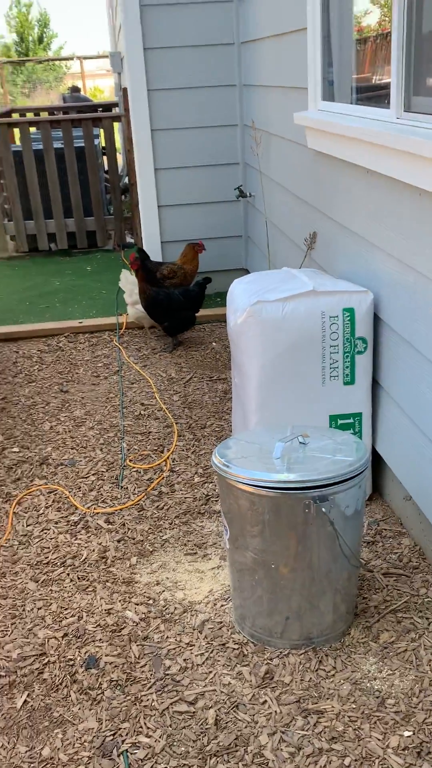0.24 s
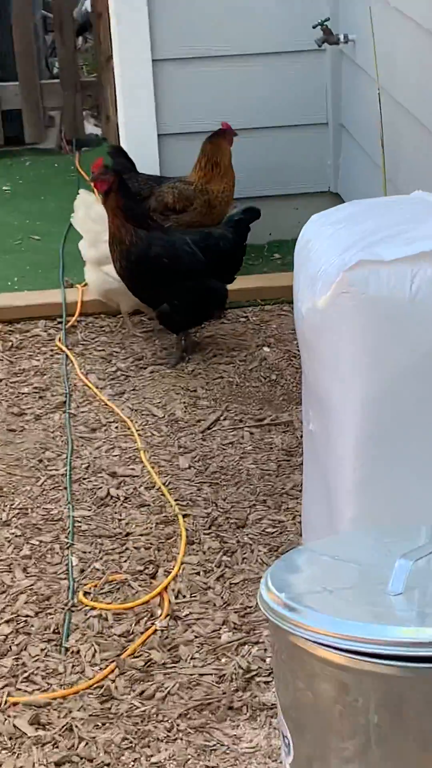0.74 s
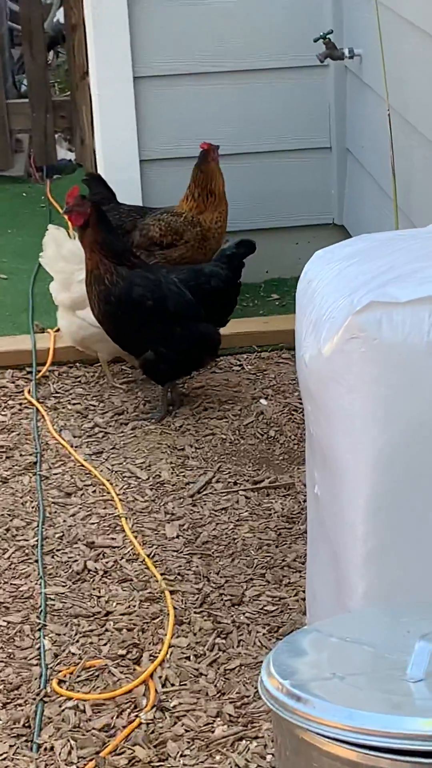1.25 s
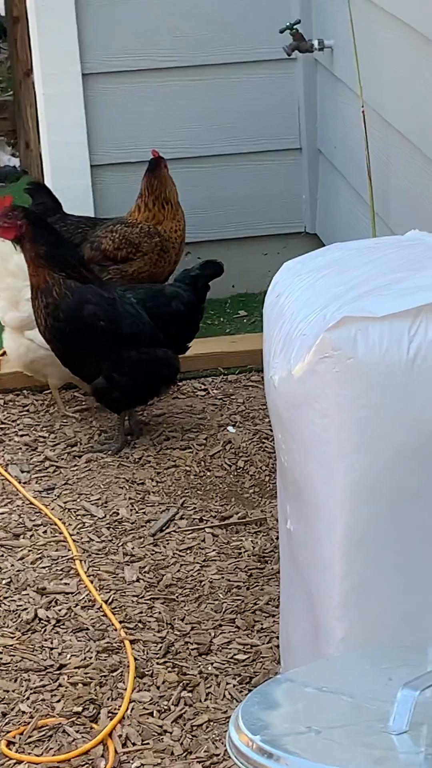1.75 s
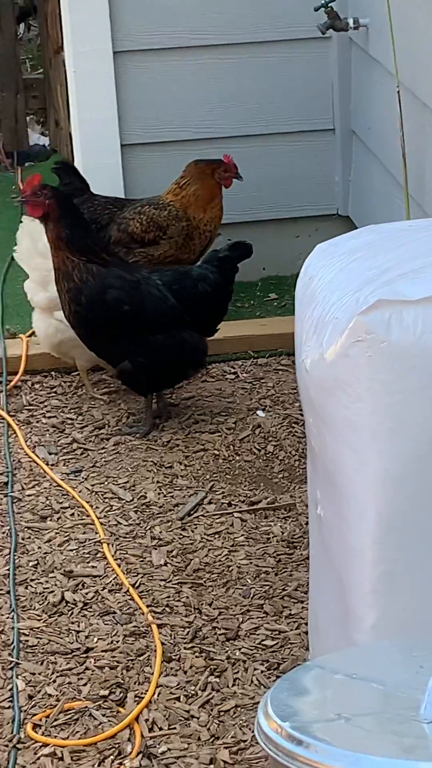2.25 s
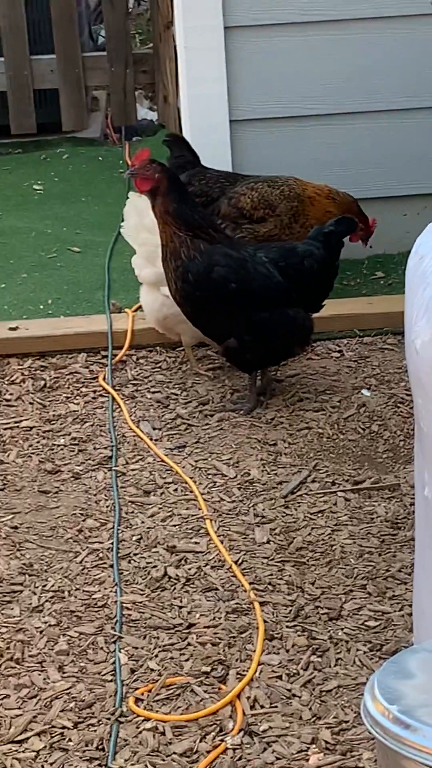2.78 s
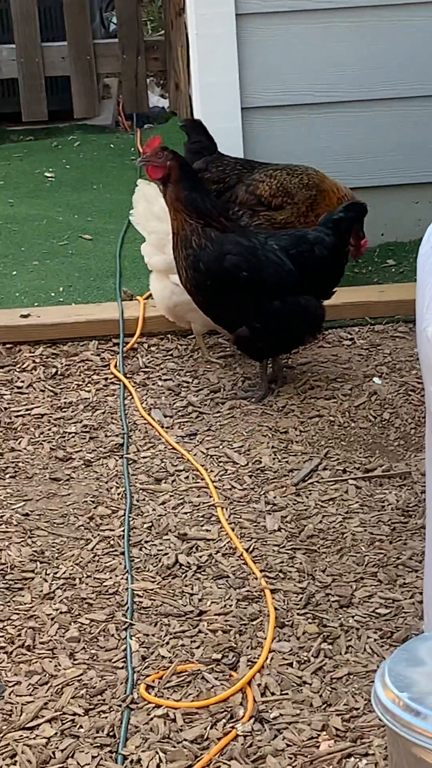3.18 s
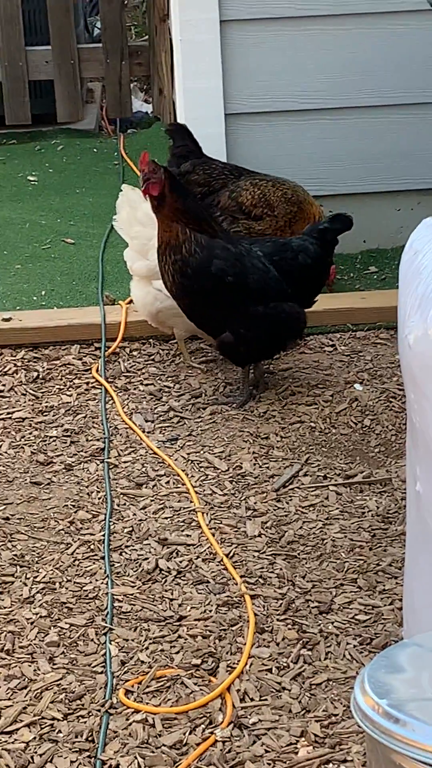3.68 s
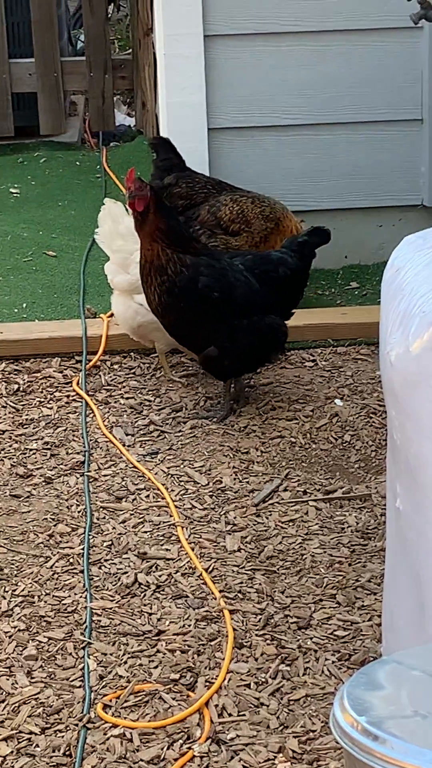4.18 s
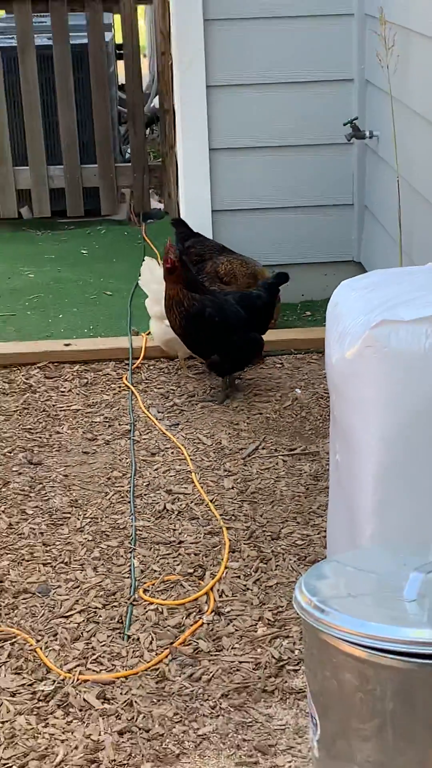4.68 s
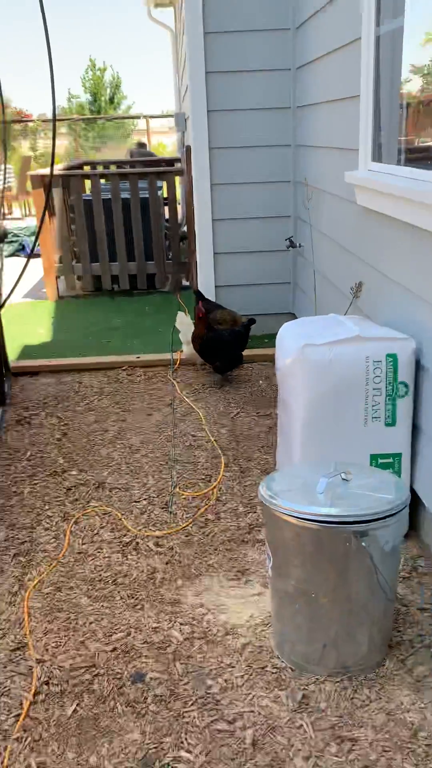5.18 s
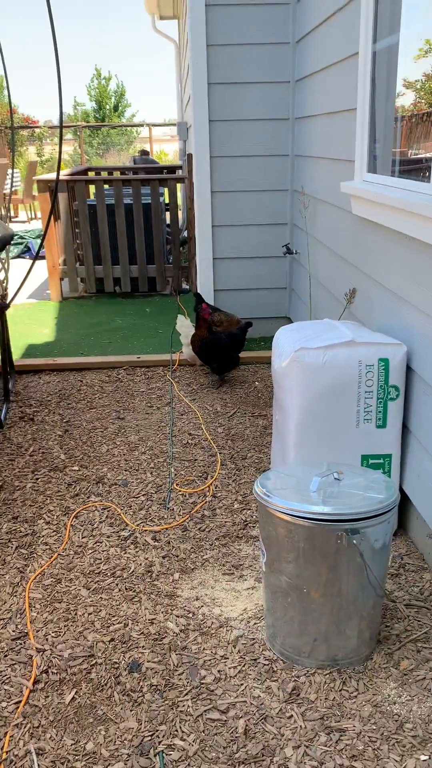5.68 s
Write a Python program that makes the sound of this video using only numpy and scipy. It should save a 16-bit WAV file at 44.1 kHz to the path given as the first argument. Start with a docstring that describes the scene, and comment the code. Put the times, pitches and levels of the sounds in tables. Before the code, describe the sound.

A hand-held camera a few metres away picks up one hen outdoors: dull, rattling clucks, a sudden bright squawk, more clucks, a second squawk, a pause, then five evenly spaced clucks. The background is a soft distant rumble with barely audible rustling and wood-chip ticks. Handling thumps come before the squawk and just as the last clucks begin. The yard adds a short, light echo.

```python
"""Hen cackling in a backyard run

A hen gives short rattling clucks beside a house wall, twice building into a long squawk that starts
hoarse, clears to a rising tone and cracks at its peak. Her voice is a train of pulses plus puffs of noise,
shaped by throat and beak. Shaped noise makes a low outdoor rumble, rustling and light swishes.
Fading low tones are bumps on the hand-held camera; tiny noise bursts are wood chips ticking."""
import sys
import numpy as np
from scipy import signal
from scipy.fft import rfft, irfft, next_fast_len
from scipy.io import wavfile
from scipy.ndimage import uniform_filter1d, map_coordinates

SR = 44100
rng = np.random.default_rng(int(sys.argv[2]) if len(sys.argv) > 2 else 0)


def dump_mix(stems):
    """Bounce the given channels to the path in sys.argv[1] as a 16-bit WAV at rate SR."""
    frames = np.atleast_2d(stems).T  # one column per channel
    limited = np.clip(frames, -1, 1)  # hard clip at full scale
    pcm = np.round(limited * 32767).astype(np.int16)
    wavfile.write(sys.argv[1], SR, pcm)


N = 261513

# Clucks. Each row: start in seconds, level in dB, swell time in seconds,
# typical beak resonance in Hz, its basic strength in dB.
CLUCKS = [(-.036, -36.5, .005, 2750, -17), (.281, -34.5, .016, 2810, -20.5), (1.27, -30, .008, 2850, -17.5),
          (2.103, -29, .024, 2180, -19), (2.399, -33, .017, 2690, -23.5), (3.24, -31.5, .002, 2697, -20.5),
          (4.646, -30, .006, 2864, -17.5), (4.944, -33, 0.024, 3143, -14.5),
          (5.244, -33.5, .025, 3130, -13.5), (5.528, -34.5, .028, 2936, -11.5),
          (5.828, -32, 0.026, 3106, -13)]
# Long squawks. Each row: start, moment it locks into a tone, is pushed, cracks, collapses and ends
# (all in seconds), depth of the brief dip in dB, treble change in dB.
SQUAWKS = [(1.517, 1.636, 1.748, 1.828, 1.865, 1.892, 5, -1.5),
           (3.519, 3.642, 3.736, 3.829, 3.858, 3.9, 11, 1)]
# Throat with the beak wide open. Each row: frequency in Hz, gain in dB.
OPEN_THROAT = [(200, -30.5), (450, -10), (640, -36.5), (880, 3.5), (1100, 5), (1330, -13), (1600, -23.5),
               (1820, -10), (2230, -3.5), (2500, -40), (4900, -48.5), (8400, -32), (12000, -43.5),
               (16000, -56.5)]
# Throat with the beak nearly shut. Each row: frequency in Hz before the neck shifts it, gain in dB.
SHUT_THROAT = [(100, -37.5), (260, -10.5), (430, -16.5), (620, -27.5), (820, -2), (1050, 1.5), (1220, -7),
               (1520, -28), (1900, -18.5), (2400, -40), (3400, -54.5), (16000, -79.5)]
# Upper resonances of the open beak. Each row: frequency in Hz, nominal width in Hz, strength in dB.
OPEN_MODES = [(3326, 240, -19), (4206, 300, -23), (5973, 540, -25.5), (7920, 360, -33.5)]
# Upper resonances of a cluck. Each row: frequency in Hz, nominal width in Hz, basic strength in dB.
CLUCK_MODES = [(3820, 330, -23.5), (5540, 300, -41), (6930, 300, -36.5), (8900, 950, -44),
               (14400, 3000, -52)]
# Wood chips ticking. Each row: start in seconds, peak level in dB, centre frequency in Hz.
TICKS = [(0.407, -41, 700), (0.595, -51.5, 1380), (.961, -50, 12430), (2.03, -57.5, 7890),
         (3.118, -45.5, 676)]
# Bumps on the camera. Each row: start in seconds, level in dB before the soft onset,
# frequency in Hz, time to fade by 60 dB in seconds.
BUMPS = [(.897, -28, 66, 0.17), (.925, -38, 100, 0.32), (4.688, -33, 108.5, 0.48),
         (4.704, -28.5, 213.6, 0.13), (4.734, -33, 159, 0.22), (4.772, -31, 98, 0.17)]
# Colour of the distant rumble. Each row: frequency in Hz, relative level in dB per Hz.
RUMBLE = [(20, -31), (48, -8), (67, 0.5), (88, -9), (140, -20), (270, -22.5), (350, -27.5), (630, -34),
          (1000, -31.5), (1500, -39.5), (2100, -51.5), (4800, -62.5), (6500, -54.5), (14000, -67)]
# Colour of the shuffling. Each row: frequency in Hz, relative level in dB per Hz.
SHUFFLE_COLOUR = [(35, -41.5), (60, -12.5), (101, -3.5), (244, -8), (289, -7), (590, -16.5), (2900, -30.5),
                  (3890, -44), (4600, -71.5), (9000, -73.5), (11700, -99), (19800, -120)]
# Colour of the swishes. Each row: frequency in Hz, relative level in dB per Hz.
SWISH_COLOUR = [(1500, -23), (3500, -6.5), (6800, 1.5), (9000, -11.5), (14500, -5.5)]
# Shuffling close to the camera. Each row: start in seconds, length in seconds, level in dB.
SHUFFLES = [(0, .57, -60), (4.67, 0.05, -39.5), (5.5, 0.5, -67)]
# Light, high swishes. Each row: start in seconds, length in seconds, level in dB.
SWISHES = [(0, 0.073, -62), (.17, .15, -64), (5.42, .08, -67)]
# How alike left and right are in the background noise. Each row: frequency in Hz, likeness (1 is mono).
ALIKE = [(60, 1), (150, 0.99), (380, .7), (950, 0.0039), (15000, 0.034)]
# Balance of the two microphone ports. Each row: frequency in Hz, left minus right in dB.
PORT_BALANCE = [(270, -0.14), (480, 2), (620, -0.5), (800, -13.5), (1000, -10), (1220, -1), (1500, 1.5),
                (2050, -1), (3000, 0.5), (5000, 0), (15000, -0.5)]
# Phase between the ports. Each row: frequency in Hz, radians by which left leads.
PORT_PHASE = [(0, -1), (550, 0), (1400, 0), (2050, 1.19), (3200, 1.04), (4900, 3), (6800, 6.5), (9100, 9.5),
              (15000, 19)]
# Tail of diffuse echoes. Each row: frequency in Hz, time to fade by 60 dB in seconds.
YARD = [(200, 0.49), (1000, 0.27), (3000, .26), (10000, 0.036)]

TOP_HZ = 15800  # upper band limit of the camera
RUMBLE_DB = -52.5  # typical level of the distant rumble
CLUCK_S, CLUCK_THROAT_HZ = .058, 1042  # length and main throat resonance of every cluck
CLUCK_START_HZ, CLUCK_END_HZ = 172.24, 279.64  # the pulse rate climbs through a cluck
ABRUPT_HZ, ABRUPT_S = 89.6, .006  # a cluck that swells within about this time starts higher
CLUCK_SPREAD = .04  # chance variation of pitch from cluck to cluck (share)
START_HZ, TONE_HZ = 179.6, 445.5  # the hoarse start climbs to the pitch of the clear tone
GLIDE_HZ, GLIDE_POWER = 52.24, 2.6  # the tone then rises ever faster until it cracks
CRACK_HZ, CRACK_HOLD_S, FALL_HZ_PER_S = 42, .022, 2200  # the pitch jumps by this, holds and falls away
# level of each stage of a squawk
HOARSE_DB, TONE_DB, PUSHED_DB, CRACKED_DB, COLLAPSED_DB = -29, -21, -15, -12, -25
SWELL_S, SWELL_DB = .024, 16.5  # the hoarse start swells by this much
LOCK_S, LOCK_LEAD_S, PUSH_S, SNAP_S = .018, 0.011, .009, .004  # how quickly the stages take over
CRACKED_OPENING = .68  # beak opening 0-1 once the voice has cracked
DIP_HZ, DIP_WIDTH_HZ = 480.3, 5.1  # the level dips briefly as the tone passes this pitch
# roughness 0-1 of each stage; the strain is added to the hoarse start and grows until the tone locks
HOARSE_ROUGH, STRAIN_ROUGH, TONE_ROUGH, CRACKED_ROUGH, COLLAPSED_ROUGH = .3, .35, .025, 0.23, .55
TREBLE_HZ = 5000  # a squawk is brighter or duller above this


def amp(db):
    """Turn decibels into a gain."""
    return 10 ** (np.asarray(db) / 20)


def unit(x):
    """Scale a sound to an rms level of 1."""
    return x / np.sqrt(np.mean(x ** 2) + 1e-20)


def along(points, hz):
    """Read a curve of (Hz, value) points on a logarithmic frequency axis."""
    f, v = np.transpose(points)
    return np.interp(np.log(hz + 1), np.log(f + 1), v)


def wobble(rate, size):
    """A smooth random curve with this many random points a second."""
    return map_coordinates(rng.standard_normal(4096), [np.arange(size) * rate / SR], mode="wrap")


def step(t, width):
    """A smooth change from 0 to 1 around t = 0."""
    return .5 + .5 * np.tanh(t / width)


def filtered(x, response):
    """Filter a sound by a complex response that depends on frequency."""
    size = x.shape[-1]
    m = 2 * next_fast_len(size // 2 + 4096)
    return irfft(rfft(x, m) * response(np.fft.rfftfreq(m, 1 / SR)), m)[..., :size]


def add(track, s, x):
    """Mix x into the track from time s."""
    start = round(s * SR)
    x = x[max(-start, 0):N - start]
    track[max(start, 0):][:len(x)] += x


def throat(points, hz):
    """A throat with the gains of the (Hz, dB) points, which only responds after it is excited."""
    cepstrum = irfft(np.log(amp(along(points, hz))))
    half = len(cepstrum) // 2
    # keeping only the forward half gives the phase that fits these gains
    return np.exp(rfft(np.r_[cepstrum[0], 2 * cepstrum[1:half]], 2 * half))


def resonances(modes, hz):
    """Steep-sided resonances: each is a simple resonance passed through twice."""
    total = 0
    for centre, width, db in modes:
        damping = 1j * hz * 0.96 * width
        total = total + amp(db) * (damping / (centre * centre - hz * hz + damping)) ** 2
    return total


def syrinx(pitch, rough, jitter, shimmer_db, rasp):
    """The voice organ: one pulse a cycle; roughness scatters timing and size and adds puffs of noise."""
    size = len(pitch)
    uneven_pitch = pitch * (1 + jitter * rough * wobble(330, size))
    phase = 2 * np.pi * np.cumsum(uneven_pitch) / SR - 1
    k = np.arange(1, 81)[:, None]  # harmonic numbers
    harmonics = np.cos(k * phase) * (k * pitch < TOP_HZ)
    pulses = np.sum(harmonics, axis=0) * np.sqrt(pitch / SR) * 2
    puffs = unit((1 + np.cos(phase)) ** 2) * rng.standard_normal(size)
    return (pulses + rasp * rough * puffs) * amp(shimmer_db * rough * wobble(400, size))


def shut_beak(hz, throat_hz, beak_hz, beak_db, treble_db):
    """The throat of a cluck: the neck stretches or shortens it, and the beak adds its own resonance."""
    stretch = 1050 / throat_hz
    beak = resonances([(beak_hz, 340, beak_db)], hz)
    return throat(SHUT_THROAT, hz * stretch) + beak + amp(treble_db) * resonances(CLUCK_MODES, hz)


def scatter(x, life=.008, level_db=1.0, above_hz=1700, turn_rate=9):
    """Short waves glance off feathers, ground and boards; their pattern drifts as the head moves."""
    t = np.arange(SR // 30) / SR
    clouds = filtered(rng.standard_normal((3, len(t))) * np.exp(-t / life),
                      lambda hz: 1 - 1 / (1 + (hz / above_hz) ** 6))
    clouds = clouds / np.linalg.norm(clouds, axis=1, keepdims=True)
    paths = signal.fftconvolve(x[None], clouds, axes=1)[:, :len(x)]
    facing = np.array([wobble(turn_rate, len(x)) for _ in paths])
    shares = facing / np.sqrt(np.sum(facing ** 2, axis=0) + .1)
    return x + amp(level_db) * np.sum(paths * shares, axis=0)


def clucks(onset_db=-9, attack=0.00089, sag_db=-3, release=0.018, beak_fall=0.027):
    """Each cluck is a short run of uneven pulses that speed up while the pressure swells and sags."""
    out, t = np.zeros(N), np.arange(SR // 8) / SR
    late = np.minimum(t / CLUCK_S, 1)
    for s, db, swell, beak_hz, beak_db in CLUCKS:
        start_hz = CLUCK_START_HZ + ABRUPT_HZ * np.exp(-swell / ABRUPT_S)
        pitch = start_hz + (CLUCK_END_HZ - start_hz) * np.tanh(2 * t / CLUCK_S)
        pitch = pitch * (1 + CLUCK_SPREAD * rng.standard_normal())
        effort_db = onset_db * np.maximum(1 - t / swell, 0) + sag_db * np.maximum(t - swell, 0) / CLUCK_S
        pressure = amp(effort_db) * (1 - np.exp(-t / attack)) * (1 - np.tanh((t - CLUCK_S) / release))
        source = pressure * syrinx(pitch, rough=.3, jitter=.13, shimmer_db=3.5, rasp=.55)
        # the cluck starts dull; its beak resonance grows and sinks as it goes on
        early_voice = filtered(source * (1 - late), lambda hz: shut_beak(
            hz, CLUCK_THROAT_HZ, beak_hz * (1 + beak_fall), beak_db - 0.5, treble_db=-2.5))
        late_voice = filtered(source * late, lambda hz: shut_beak(
            hz, CLUCK_THROAT_HZ, beak_hz * (1 - beak_fall), beak_db + 2, treble_db=0.5))
        voice = unit(scatter(early_voice + late_voice))
        # the level counts over the cluck's length, not over the whole stretch of t
        add(out, s, amp(db) * voice * np.sqrt(CLUCK_S * SR / len(t)))
    return out


def rush(spectrum):
    """Stereo noise of rms 1, near mono in the bass."""
    def mid_and_side(hz):
        """Shares of the common sound and of the left-right difference."""
        turn = np.arccos(np.clip(along(ALIKE, hz), -1, 1)) / 2
        return amp(along(spectrum, hz)) * [np.cos(turn), np.sin(turn)]
    mid, side = filtered(rng.standard_normal((2, N)), mid_and_side)
    return unit(np.array([mid + side, mid - side]))


def strokes(rows, attack, fall_db_per_s):
    """Gain of (start s, length s, dB) movements that rise, hold and die away."""
    t = np.arange(N) / SR
    gain = np.zeros(N)
    for s, length, db in rows:
        fall_db = fall_db_per_s * np.maximum(t - s - length, 0)
        gain += step(t - s, attack) * amp(db - fall_db)
    return gain


def background():
    """Distant rumble, uneven shuffling and light swishes, all noise with wavering levels."""
    rumble = amp(RUMBLE_DB + 0.79 * wobble(11, N)) * rush(RUMBLE)
    shuffling = strokes(SHUFFLES, attack=0.045, fall_db_per_s=34.5) * amp(1.3 * wobble(60, N))
    swishing = strokes(SWISHES, attack=.015, fall_db_per_s=168) * amp(2.2 * wobble(35, N))
    return rumble + shuffling * rush(SHUFFLE_COLOUR) + swishing * rush(SWISH_COLOUR)


def knocks():
    """Dry ticks of wood chips (brief filtered noise) and soft low bumps on the camera (fading tones)."""
    out, t = np.zeros(N), np.arange(SR // 3) / SR
    for s, db, centre_hz in TICKS:
        burst = amp(-60 * t / 0.0033) * rng.standard_normal(len(t))
        tick = filtered(burst, lambda hz: resonances([(centre_hz, 0.94 * centre_hz, 0)], hz))
        add(out, s, amp(db) * tick / np.abs(tick).max())
    for s, db, hz, t60 in BUMPS:
        fade = amp(db - 60 * t / t60) * (1 - np.exp(-t / 0.0049))
        add(out, s, fade * np.sin(2 * np.pi * hz * t))
    return out


def squawk_stages(t, start, lock, push, crack, collapse, end, dip_db):
    """Pitch, level, roughness and beak opening as one squawk passes through its stages."""
    climb = np.clip((t - start) / (lock - start), 0, 1)
    glide = np.clip((t - lock) / (crack - lock), 0, 1)
    locked, pushed = step(t - lock + LOCK_LEAD_S, LOCK_S), step(t - push, PUSH_S)
    cracked, collapsed = step(t - crack, SNAP_S), step(t - collapse, SNAP_S)
    pitch = (START_HZ + (TONE_HZ - START_HZ) * climb + GLIDE_HZ * glide ** GLIDE_POWER + CRACK_HZ * cracked
             - FALL_HZ_PER_S * np.maximum(t - crack - CRACK_HOLD_S, 0))
    stage_db = (HOARSE_DB + (TONE_DB - HOARSE_DB) * locked + (PUSHED_DB - TONE_DB) * pushed
                + (CRACKED_DB - PUSHED_DB) * cracked + (COLLAPSED_DB - CRACKED_DB) * collapsed)
    swell_db = -SWELL_DB * np.maximum(1 - (t - start) / SWELL_S, 0)
    ending_db = 20 * np.log10(step(end - t, SNAP_S))
    brief_dip_db = dip_db * (1 - cracked) * np.exp(-((pitch - DIP_HZ) / DIP_WIDTH_HZ) ** 2)
    db = stage_db + swell_db + ending_db - brief_dip_db
    rough = ((HOARSE_ROUGH + STRAIN_ROUGH * climb) * (1 - locked) + TONE_ROUGH * (locked - cracked)
             + CRACKED_ROUGH * (cracked - collapsed) + COLLAPSED_ROUGH * collapsed)
    opening = locked - (1 - CRACKED_OPENING) * cracked
    return pitch, db, rough, opening


def squawks(full_db=-20, saturation=0.43, ring_hz=1020, ring_width_hz=330):
    """A cluck that runs on: the beak opens, the pulses lock into a clear tone, then break up under strain."""
    out = np.zeros(N)
    for start, lock, push, crack, collapse, end, dip_db, treble_db in SQUAWKS:
        t = np.arange(start, end + 2 * SNAP_S, 1 / SR)
        pitch, db, rough, opening = squawk_stages(t, start, lock, push, crack, collapse, end, dip_db)
        source = syrinx(pitch, np.clip(rough, 0, 1), jitter=.15, shimmer_db=5, rasp=.5)
        open_voice = filtered(source * opening,
                              lambda hz: throat(OPEN_THROAT, hz) + resonances(OPEN_MODES, hz))
        shut_voice = filtered(source * (1 - opening), lambda hz: shut_beak(
            hz, throat_hz=1075, beak_hz=2910, beak_db=-19.0, treble_db=0))
        voice = filtered(open_voice + shut_voice,
                         lambda hz: amp(treble_db * step(hz - TREBLE_HZ, TREBLE_HZ / 10)))
        # even out the loudness, so that the stages alone set the level
        voice /= np.sqrt(np.abs(uniform_filter1d(voice ** 2, size=400)) + 1e-12)
        # past full voice, the extra effort goes mostly into the main throat resonance
        ring = filtered(voice, lambda hz: 1 / (1 + ((hz - ring_hz) / ring_width_hz) ** 4))
        overtones = amp(-saturation * np.maximum(db - full_db, 0)) * (voice - ring)
        call = amp(db) * (ring + overtones)
        add(out, start, scatter(call, life=0.0093, level_db=2.5, above_hz=2800, turn_rate=22))
    return out


def yard(x, wall_s=0.012, wall_db=-21, fence_s=0.059, fence_db=-23, tail_db=-17, width=0.64):
    """The hen at the two microphone ports, with echoes from wall and fence and a short diffuse tail."""
    # the tail is noise that fades sooner in the treble
    hz, t, z = signal.stft(rng.standard_normal((2, SR // 2)), SR, nperseg=256)
    fade = amp(-60 * t / along(YARD, hz)[:, None]) * (1 - np.exp(-t / 0.0039))
    tail = signal.istft(z * fade, SR, nperseg=256)[1]
    diffuse = signal.fftconvolve(x[None], tail / np.linalg.norm(tail[0]), axes=1)[:, :N]

    def echoes(f):
        """The direct sound plus one delayed copy each from wall and fence."""
        wall = amp(wall_db) * np.exp(-2j * np.pi * f * wall_s)
        fence = amp(fence_db) * np.exp(-2j * np.pi * f * fence_s)
        return 1 + wall + fence

    def ports(f):
        """Level and phase at the left and right port."""
        ratio = amp(along(PORT_BALANCE, f))
        phase_hz, lead = np.transpose(PORT_PHASE)
        turn = np.exp(.5j * np.interp(f, phase_hz, lead))
        return 2 * np.array([ratio * turn, 1 / turn]) / (1 + ratio)

    frontal = filtered(x, echoes) + amp(tail_db) * diffuse[0]
    sideways = width * amp(tail_db) * np.array([diffuse[1], -diffuse[1]])
    return filtered(frontal, ports) + sideways


def scene():
    """The hen in her yard, over the background and knocks."""
    return yard(clucks() + squawks()) + background() + knocks()


def record(dry):
    """The camera keeps nothing above its band limit."""
    return filtered(dry, lambda hz: hz < TOP_HZ)


dry = scene()
out = record(dry)
dump_mix(out)
```